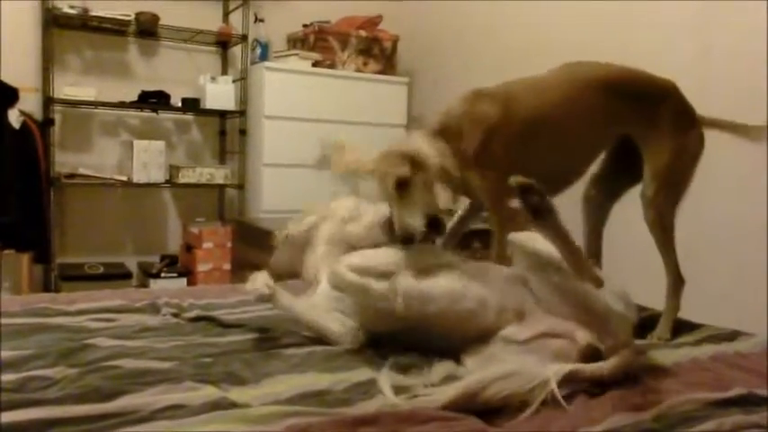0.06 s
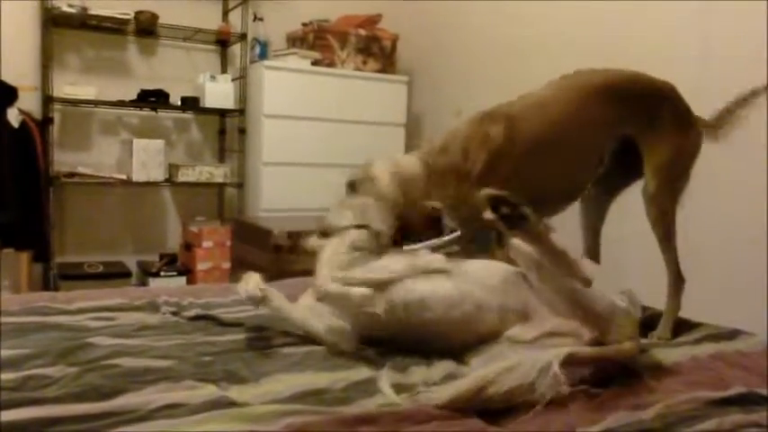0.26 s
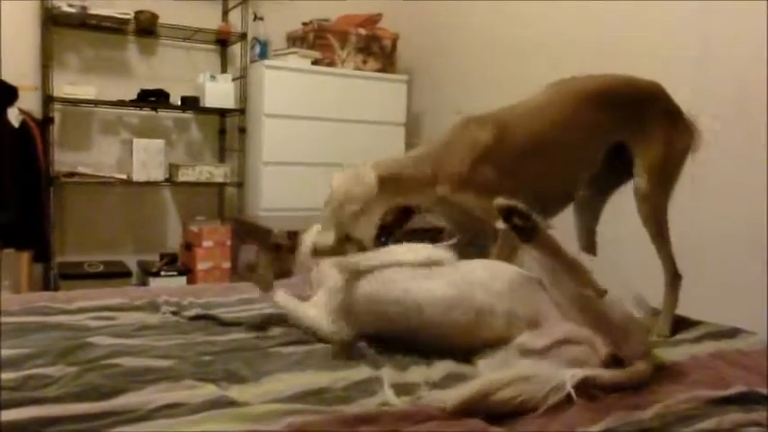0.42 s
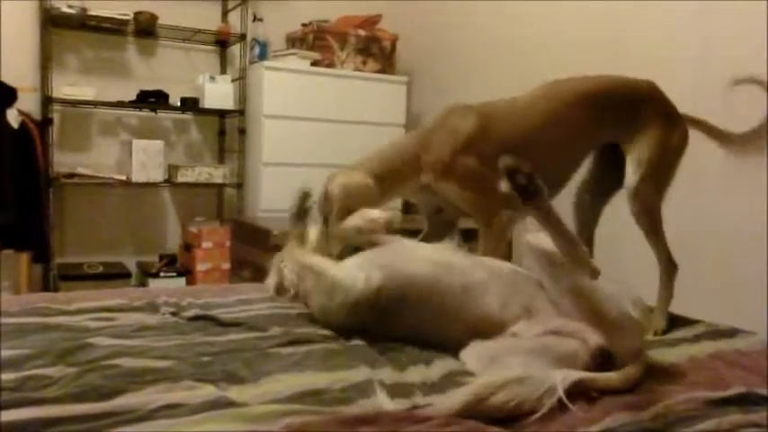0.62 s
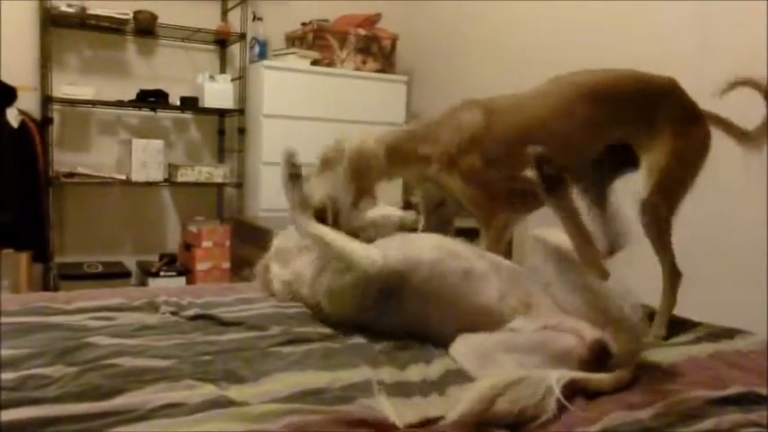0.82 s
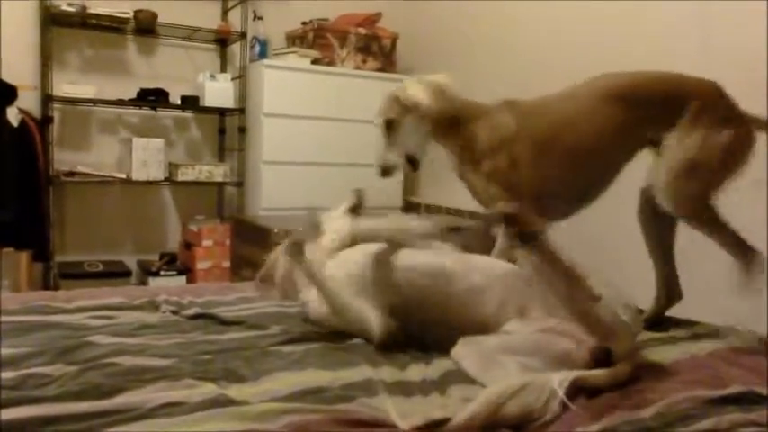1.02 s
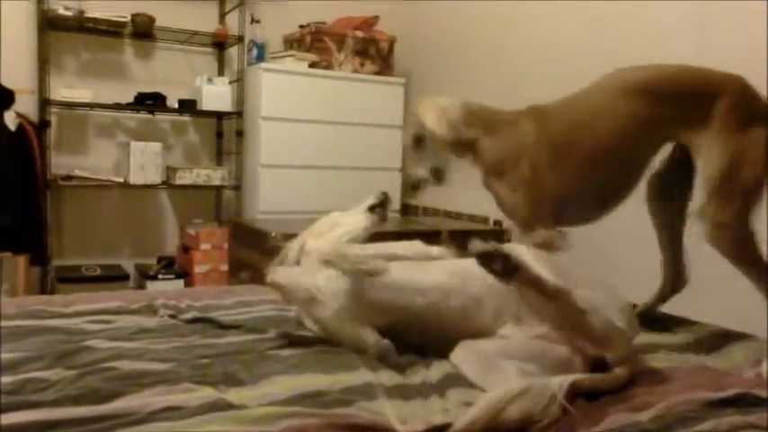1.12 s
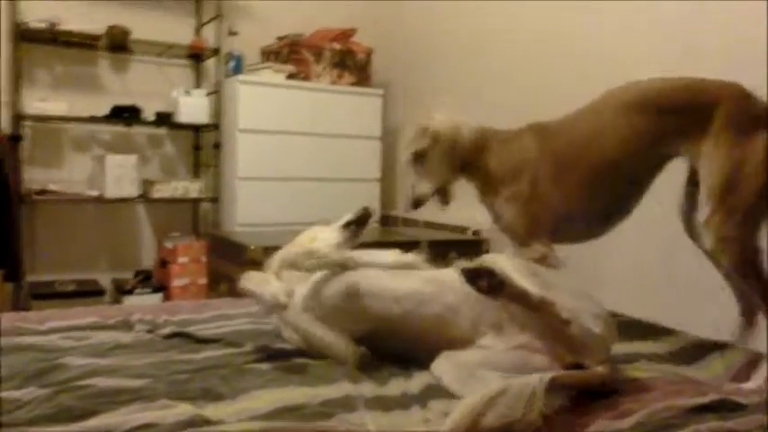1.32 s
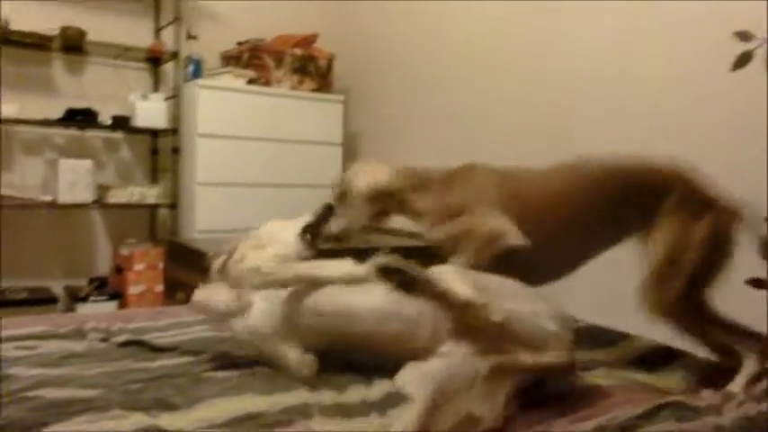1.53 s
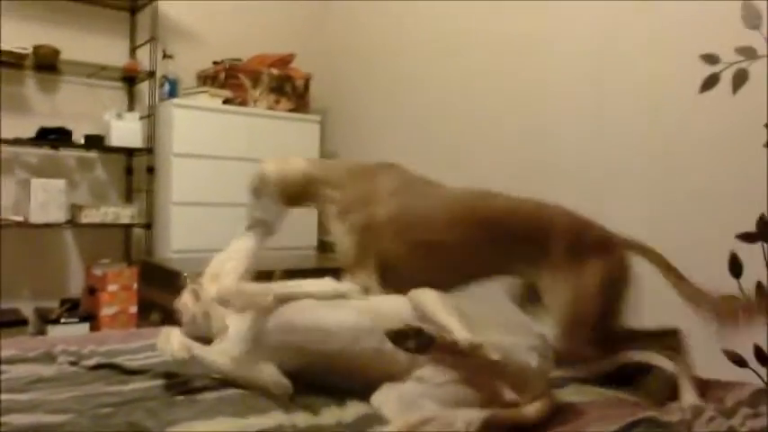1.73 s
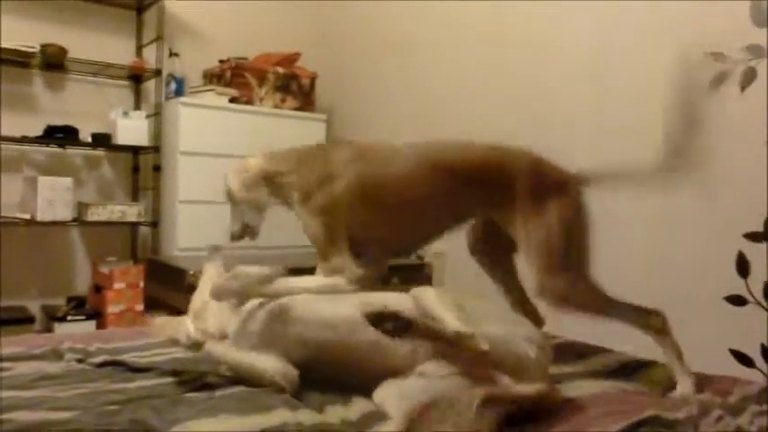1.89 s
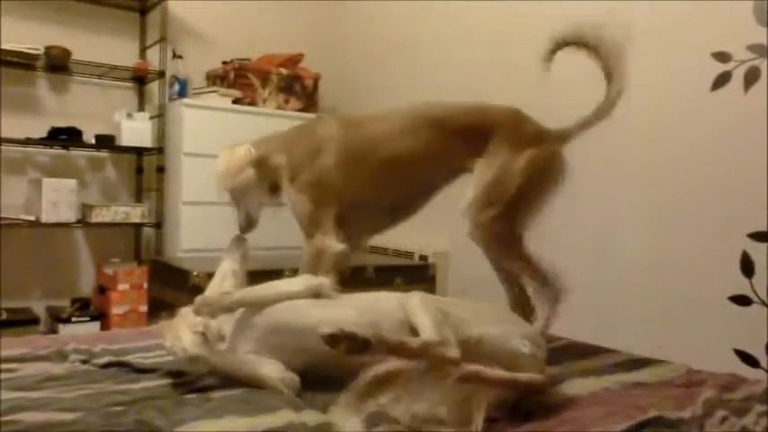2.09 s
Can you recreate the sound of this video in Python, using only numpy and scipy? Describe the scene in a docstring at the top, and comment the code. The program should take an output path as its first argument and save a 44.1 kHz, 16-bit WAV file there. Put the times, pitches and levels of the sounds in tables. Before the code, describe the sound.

A low pulsing dog growl swells and roughens, then stops; nose air and rustling cloth follow, then clustered muffled landings with a deep bed boom, heard fairly close in a small furnished room with faint steady background.

```python
"""A small quiet bedroom, two dogs wrestling on the bed. Cloth grains rustle and sniffs of filtered air pass.
One dog gives a long play growl: slow throat pulses sound chest and mouth, rise in pitch and sink again,
roughen with an irregular flutter and end in a rasp of air bursts past the teeth.
Paws land on the mattress as decaying tones and noise; one deep wavering tone is the boom of the bed.
A short tail of decaying noise puts the dogs in the room, over a faint steady background."""
import sys
import numpy as np
from scipy import signal
from scipy.io import wavfile
from scipy.ndimage import uniform_filter1d

SR = 44100
rng = np.random.default_rng(int(sys.argv[2]) if len(sys.argv) > 2 else 0)


def store_wav(level_fs):
    """Save 16-bit WAV to argv[1]."""
    pcm = np.round(np.clip(np.atleast_2d(level_fs), -1, 1) * 32767)
    wavfile.write(sys.argv[1], SR, pcm.T.astype(np.int16))


N = 94815
T = np.arange(N) / SR  # s

# the growl's course: t/s, pulse rate f/Hz, chest level/dB and mouth level/dB, both before their trims
GROWL = [(0.18, 66.53, -56, -45), (0.202, 67.1, -29, -35.5), (0.238, 69.98, -24, -30),
         (0.334, 68.77, -24, -32), (0.402, 69.64, -25, -32.5), (0.456, 78.42, -27, -29.5),
         (0.498, 84.05, -20.5, -23.5), (0.544, 85.55, -22.5, -27), (0.61, 88.2, -20.5, -21.5),
         (0.632, 88.7, -15.5, -25), (0.698, 89.25, -21, -26.5), (0.774, 88.43, -19.5, -26.5),
         (0.814, 79.7, -19.5, -27), (0.838, 78.25, -25.5, -26), (0.876, 77.9, -22.5, -26.5),
         (0.97, 76.05, -23.5, -31), (1.01, 75.8, -31.5, -61), (1.06, 77, -39, -60)]
# tone of the mouth, also sounded by the flutter: f/Hz, level/dB
MOUTH_TONE = [(250, -33.5), (350, -9.5), (415, -3), (455, 3.5), (530, 1.5), (630, -4.5), (720, -2.5),
              (820, -1), (950, -4), (1100, -13.5), (1350, -31.5), (2500, -38.5)]
# paws and bodies landing: t/s, thud f/Hz, then level/dB of thud, knock, slap, cloth scuff and bed boom
# (the noise part of the thud has a further trim)
BLOWS = [(.97, 98, -25.5, -46, -57, -56, -48), (1.12, 131, -41.5, -50, -46, -46.5, -59),
         (1.314, 123, -45.5, -61, -50.5, -49, -56), (1.38, 95.6, -26, -29, -43.5, -35, -32),
         (1.529, 107, -40, -35.5, -51, -63, -37), (1.576, 127, -33, -48, -47.5, -68, -46),
         (1.626, 209.4, -26.5, -30, -50, -37.5, -55), (1.633, 90, -23, -41, -30, -35.5, -50),
         (1.667, 166.4, -22.5, -32.5, -48, -57, -26), (1.697, 131.3, -20.5, -52, -51, -59, -42),
         (1.735, 94, -30.5, -57, -60, -58, -21.5), (1.775, 123, -24.5, -38, -54, -54, -35),
         (1.829, 111, -39, -44, -64, -35.5, -57)]
SHIMMER_DB = 0.5  # spread of pulse strength at full roughness, and in the flutter
BLOW_RISE_S, THUD_T60 = 0.0058, 0.23  # s


def amp(db):
    """Decibels to gain."""
    return 10 ** (np.asarray(db) / 20)


def unit(x):
    """Scales to rms 1."""
    return x / np.sqrt(np.mean(x ** 2) + 1e-20)


def steady(x):
    """Holds the running level near rms 1."""
    power = uniform_filter1d(uniform_filter1d(x ** 2, size=1800), size=1800)
    return x / np.sqrt(abs(power) + 1e-12)


def curve(rows, axis=1):
    """One column of a table as a curve in time."""
    rows = np.array(rows)
    return np.interp(T, rows[:, 0], rows[:, axis])


def level(rows, axis=1):
    """A dB column as gain, falling 1000 dB per second outside its span."""
    outside = np.maximum(np.maximum(rows[0][0] - T, T - rows[-1][0]), 0)
    return amp(curve(rows, axis) - 1000 * outside)


def read(points, hz):
    """Reads a spectrum table on a log-frequency axis."""
    f, value = np.transpose(points)
    return np.interp(np.log(hz + 1), np.log(f), value)


def colour(x, points):
    """Causal minimum-phase filter with the given spectrum, falling 18 dB per octave beyond its ends."""
    hz = abs(np.fft.fftfreq(8192, 1 / SR)) + 1
    octaves_beyond = abs(np.log2(hz / np.clip(hz, points[0][0], points[-1][0])))
    gain_db = np.maximum(read(points, hz) - 18 * octaves_beyond, -100)
    log_gain = np.log(amp(gain_db))
    taps = np.fft.ifft(np.exp(np.conj(signal.hilbert(log_gain)))).real[:4096]
    return signal.fftconvolve(x, taps)[:N]


def noise(points):
    """Coloured noise of rms 1."""
    return unit(colour(rng.standard_normal(N), points))


def resonate(x, hz, width_hz):
    """A steep resonance that follows the curve hz: shift down to zero, smooth twice, shift back."""
    turn = np.exp(2j * np.pi * np.cumsum(hz) / SR)
    r = np.exp(-np.pi * width_hz / SR)
    smoothed = signal.lfilter([(1 - r) ** 2], [1, -2 * r, r * r], x / turn)
    return (turn * smoothed).real


def arch(start, length):
    """A smooth swell and fall."""
    return np.sin(np.pi * np.clip((T - start) / length, 0, 1))


def strike(start, rise_s, t60):
    """Straight rise, then exponential decay by 60 dB in t60 seconds."""
    rise = np.clip((T - start) / rise_s, 0, 1)
    return rise * amp(-60 * np.maximum(T - start - rise_s, 0) / t60)


def pulses(hz, jitter, spread_db, lag=0):
    """Throat pulses, each a little off in time and strength, and the place within each cycle."""
    turns = np.cumsum(hz) / SR - lag
    cycle = np.arange(1, int(turns[-1]))
    late, strong = rng.standard_normal((400, 2))[:len(cycle)].T
    at = np.searchsorted(turns, cycle)  # even pulses first, then each one displaced
    at = np.sort(np.clip(np.searchsorted(turns, cycle + late * jitter[at]), 0, N - 1))
    train = np.zeros(N)
    train[at] = amp(strong * spread_db[at])
    return train, np.interp(np.arange(N), at, cycle) % 1


def bedding():
    """Cloth rubbing under the dogs: dense small grains of random strength, coloured as one rustle."""
    # rustle of the bedding: t/s, level/dB
    rustle_level = [(0, -54), (.12, -56), (.2, -47.5), (.9, -45.5), (1.12, -48), (1.27, -52), (1.33, -44.5),
                    (1.45, -45), (1.51, -41.5), (1.6, -42), (1.7, -42), (1.85, -48), (1.94, -44.5),
                    (2.0, -49.5), (2.15, -51.5)]
    # tone of the cloth: f/Hz, level/dB
    rustle_tone = [(50, -21), (120, 10.5), (250, 4.5), (450, -2.5), (800, -4.5), (1500, -7), (4000, -12.5),
                   (9000, -19.5), (16000, -19)]
    grains_per_s, spread_db = 2300, 4.5
    size = amp(spread_db * np.minimum(rng.exponential(1, N), np.pi))
    struck = rng.random(N) < grains_per_s / SR
    grains = size * rng.standard_normal(N) * struck
    return level(rustle_level) * unit(colour(grains, rustle_tone))


def sniffs():
    """Air drawn through a dog's nose is broad noise; narrow resonances of noise ring in the nostrils."""
    # quick sniffs: start t/s, length t/s, peak level/dB
    sniff_times = [(-.03, .2, -45.5), (1.063, 0.2, -47)]
    # tone of the nose: f/Hz, level/dB
    sniff_tone = [(400, -4), (900, 3.5), (1200, 9), (1450, 5), (1720, -9), (2000, -8), (2400, 0),
                  (3000, -2.5), (3700, -2.5), (6000, -6.5), (8000, -12.5), (11000, -15), (16000, -21)]
    # air ringing in the nostrils: start t/s, length t/s, f/Hz, peak level/dB
    whistles = [(1.034, 0.173, 1700, -49), (1.045, 0.27, 514, -57), (1.15, 0.12, 1567, -50),
                (0.555, 0.24, 1745, -49), (0.197, 0.089, 1570, -46.5)]
    whistle_width_hz = 49.6
    swell = sum(amp(db) * arch(start, length) for start, length, db in sniff_times)
    out = swell * noise(sniff_tone)
    for start, length, hz, db in whistles:
        ring = resonate(rng.standard_normal(N), np.full(N, hz), whistle_width_hz)
        out += amp(db) * arch(start, length) * steady(ring)
    return out


def bed():
    """One deep mode of the bed swells after each landing over a continuing drone, its pitch wavering."""
    # drone of the bed: t/s, level/dB
    sway = [(0, -60), (.9, -51), (1.02, -40), (1.09, -48), (1.3, -44), (1.6, -47), (1.95, -40.5),
            (2.15, -39)]
    bed_hz, rise_s, t60 = 42.5, 0.052, .5
    wander_share = 0.0523  # rms share by which the pitch wanders
    booms = sum((amp(row[-1]) * strike(row[0], rise_s, t60)) ** 2 for row in BLOWS)
    power = level(sway) ** 2 + booms
    wander = unit(uniform_filter1d(rng.standard_normal(N), size=4000))
    turns = np.cumsum(bed_hz * (1 + wander_share * wander)) / SR
    return np.sqrt(2 * power) * np.sin(2 * np.pi * turns)


def growl():
    """Throat pulses and puffs of air drive the chest, the mouth and the upper resonances."""
    # roughness of the voice: t/s, share 0-1
    roughness = [(.2, .3), (.3, .35), (.42, .5), (.49, .12), (.59, .15), (.64, .75), (.8, .8), (.86, .1),
                 (.96, .12), (1.02, .7)]
    # a second, looser pulse in mid-cycle: t/s, relative strength
    afterbeat = [(.2, .42), (.4, .42), (.48, .05), (1.0, .05)]
    jitter, afterbeat_jitter = 0.055, 0.0783  # shares of a cycle, the first at full roughness
    puff_floor, puff_share = 0.26, 0.5  # air between puffs; decay of a puff as a share of a cycle
    air, mouth_air = 1, 0.26  # air noise at full roughness, and further air in the mouth
    rough = np.clip(curve(roughness), 0, 1)
    pulse_hz = curve(GROWL)
    first, place = pulses(pulse_hz, jitter * rough, SHIMMER_DB * rough)
    second, _ = pulses(pulse_hz, np.full(N, afterbeat_jitter), SHIMMER_DB * rough, lag=.5)
    train = first + curve(afterbeat) * second
    puffs = unit((puff_floor + np.exp(-place / puff_share)) * rng.standard_normal(N))
    drive = unit(train) + air * rough * puffs
    airy = drive + mouth_air * rough * puffs
    return add_flutter(chest(drive)) + mouth(airy) + snarl(puffs + .5 * drive) + rasp(place)


def chest(drive):
    """The chest colours the throat pulses with its low resonances."""
    # tone of the chest: f/Hz, level/dB
    chest_tone = [(40, -56), (72, -16.5), (95, -8), (135, 2), (170, 0.5), (210, -5), (258, -0.5), (285, -9),
                  (310, -11.5), (350, -20.5), (500, -40.5)]
    trim_db = -0.5
    return amp(trim_db) * level(GROWL, axis=2) * steady(colour(drive, chest_tone))


def add_flutter(voice):
    """A second, irregular throat oscillation sounds chest and mouth and weakens the chest voice."""
    # flutters: start t/s, length t/s, f/Hz, level/dB of the chest part
    flutters = [(0.621, 0.213, 122.1, -19.5), (0.961, 0.073, 124.2, -27.5)]
    # tone of the flutter in the chest: f/Hz, level/dB
    flutter_tone = [(45, -33), (85, -11), (120, 0), (180, -6), (260, -4.5), (350, -27.5), (700, -31)]
    jitter, rise_s, fall_s = 0.156, 0.0092, 0.038  # share of a cycle, s, s
    takes_db, mouth_db = -5, -11  # change of the chest voice; mouth part relative to chest part
    for start, length, hz, db in flutters:
        gate = np.clip(np.minimum((T - start) / rise_s, (start + length - T) / fall_s), 0, 1)
        flaps, _ = pulses(np.full(N, hz), np.full(N, jitter), np.full(N, SHIMMER_DB))
        in_chest = steady(colour(flaps, flutter_tone))
        in_mouth = amp(mouth_db) * steady(colour(flaps, MOUTH_TONE))
        voice = voice * amp(takes_db * gate) + amp(db) * gate * (in_chest + in_mouth)
    return voice


def mouth(airy):
    """The mouth colours pulses and air, with one further resonance that moves in pitch."""
    # moving resonance of the mouth, dipping and then rising: t/s, f/Hz
    moving_hz = [(.2, 1050), (.36, 1100), (.48, 900), (.7, 990), (.85, 1067), (.98, 1160)]
    trim_db, moving_db, moving_width_hz = -2, -8.5, 150  # the moving level is relative to the mouth
    moving = amp(moving_db) * steady(resonate(airy, curve(moving_hz), moving_width_hz))
    return amp(trim_db) * level(GROWL, axis=3) * (steady(colour(airy, MOUTH_TONE)) + moving)


def snarl(breath):
    """An upper resonance of the mouth, sounded by puffs and pulses together."""
    # upper resonance: t/s, centre f/Hz, level/dB
    snarl_course = [(.18, 1590, -55), (.22, 1550, -48), (.27, 1580, -45.5), (.34, 2000, -59),
                    (.43, 2170, -48.5), (.55, 2090, -49), (.6, 1780, -45), (.66, 1750, -51),
                    (.8, 1760, -57), (1.0, 1800, -62)]
    ring = resonate(breath, curve(snarl_course), width_hz=320)
    return level(snarl_course, axis=2) * steady(ring)


def rasp(place):
    """Each pulse shoots a short burst of air past teeth and lips, and some air leaks between bursts."""
    # air leaking between bursts: t/s, relative strength
    leak = [(.2, .25), (.6, .4), (.8, .3), (.87, .05), (.96, .05), (1.02, .3)]
    # resonance at the teeth: t/s, centre f/Hz, level/dB
    teeth_course = [(.45, 4100, -84), (.64, 4530, -60), (.69, 3070, -49), (.75, 3100, -43.5),
                    (.82, 3721, -47.5), (.88, 4460, -45), (.95, 4270, -46), (1.03, 4355, -62)]
    # hiss of air between the lips: t/s, level/dB
    hiss_level = [(.19, -58), (.25, -44), (.33, -69), (.43, -58), (.5, -59), (.63, -50), (.8, -56),
                  (.93, -43.5), (1.02, -59)]
    # tone of that hiss: f/Hz, level/dB
    hiss_tone = [(1500, -19.5), (3000, 10), (4500, 8), (5700, 7), (7500, -11), (9200, 9), (10500, 0),
                 (12500, -8), (16000, -23)]
    # thin hiss through the lips: start t/s, length t/s, f/Hz, peak level/dB
    lip_whistle = (0.4, 0.38, 10300, -53.5)
    burst_share, teeth_width_hz, lip_width_hz = .09, 1400, 700  # burst decay as a share of a cycle
    rattle = (curve(leak) + np.exp(-place / burst_share)) * rng.standard_normal(N)
    teeth = level(teeth_course, axis=2) * steady(resonate(rattle, curve(teeth_course), teeth_width_hz))
    start, length, hz, db = lip_whistle
    lips = amp(db) * arch(start, length) * steady(resonate(rattle, np.full(N, hz), lip_width_hz))
    hiss = level(hiss_level) * steady(colour(rattle, hiss_tone))
    return teeth + lips + hiss


def blows():
    """Each landing thuds into the mattress, knocks the frame, and slaps and scuffs the cover."""
    # tone of the thud's noise: f/Hz, level/dB
    thud_tone = [(50, -17), (85, 6), (140, 1.5), (250, -6), (330, -28), (600, -30)]
    # tone of the frame's knock: f/Hz, level/dB
    knock_tone = [(120, -34), (230, 1), (330, 0), (550, -3.5), (800, -13.5), (1200, -19), (3000, -27)]
    # tone of the slap on the cover: f/Hz, level/dB
    slap_tone = [(700, -10), (1100, 3), (1400, -12), (1800, 3), (2300, 3), (2900, -7), (4200, -10),
                 (6000, -18)]
    # tone of the cloth scuff: f/Hz, level/dB
    scuff_tone = [(600, 2), (2000, -7), (4300, -3), (6500, -1.5), (8500, -0.5), (11000, 0.5), (13500, -8),
                  (16000, -30)]
    # tone, decay t60 in s, trim in dB, in the order of the level columns
    parts = [(thud_tone, THUD_T60, -2.5), (knock_tone, 0.27, 0), (slap_tone, 0.25, 0), (scuff_tone, 0.25, 0)]
    out = np.zeros(N)
    for column, (tone, t60, trim_db) in enumerate(parts, start=2):
        power = sum((amp(row[column]) * strike(row[0], BLOW_RISE_S, t60)) ** 2 for row in BLOWS)
        out += amp(trim_db) * np.sqrt(power) * steady(noise(tone))
    for start, hz, db, *_ in BLOWS:
        thud = np.sin(2 * np.pi * hz * (T - start))
        out += np.sqrt(2) * amp(db) * strike(start, BLOW_RISE_S, THUD_T60) * thud
    return out


def room(x):
    """A short diffuse bedroom tail, the treble dying first; three decaying noise tails exchange steadily."""
    # decay of the room: f/Hz, t60 t/s
    room_t60 = [(100, 0.49), (500, 0.44), (3000, 0.22), (12000, 0.18)]
    # tone sent into the room: f/Hz, level/dB
    room_send = [(60, -7), (200, -13.5), (400, 3), (800, -1), (16000, 4.5)]
    exchange_hz = 1.1  # rate of the exchange between the tails
    send, out = colour(x, room_send), np.zeros(N)
    for k in range(3):
        hz, t, z = signal.stft(rng.standard_normal(SR // 2), SR, nperseg=256)
        decay = amp(-60 * t / read(room_t60, hz)[:, None])
        tail = signal.istft(z * decay, SR, nperseg=256)[1]
        tail = tail * (np.arange(len(tail)) > .003 * SR)  # a gap of 3 ms before the first reflection
        share = np.sqrt(2 / 3) * np.cos(2 * np.pi * exchange_hz * T + k * np.pi / 3)
        out += signal.fftconvolve(send * share, tail / np.linalg.norm(tail))[:N]
    return out


def scene():
    """Dogs and bedding with their room tail, landings and bed dry, over a faint steady background noise."""
    # tone of the background: f/Hz, level/dB
    floor_tone = [(18, -40), (30, -9), (55, -2.5), (111, -2), (187, -10), (341, -9), (399, -10.5),
                  (673, -17), (996, -16), (1870, -19.5), (3320, -22), (9190, -27.5), (15500, -33.5)]
    floor_db, room_db = -45.5, -4.5
    dogs = bedding() + sniffs() + growl()
    background = amp(floor_db) * noise(floor_tone)
    return (dogs + amp(room_db) * room(dogs) + bed() + blows() + background)[None]


def record(dry):
    """One microphone channel, with the recorder's steep band limit."""
    edge_hz = 15700
    taps = signal.firwin(2047, edge_hz, window=("kaiser", 9), fs=SR)
    return signal.oaconvolve(dry, taps[None], "same")


dry = scene()
out = record(dry)
store_wav(out)
```